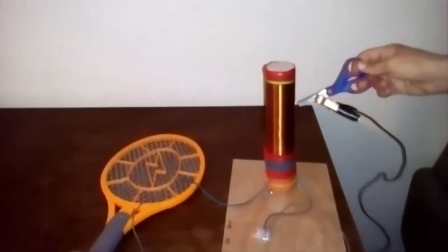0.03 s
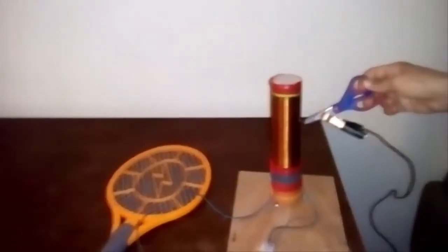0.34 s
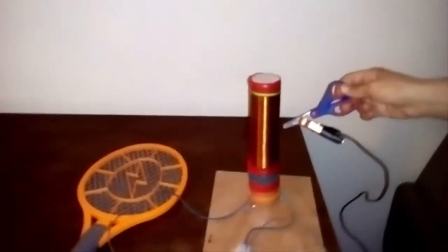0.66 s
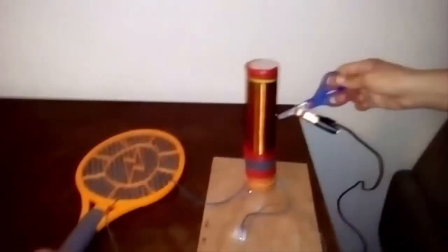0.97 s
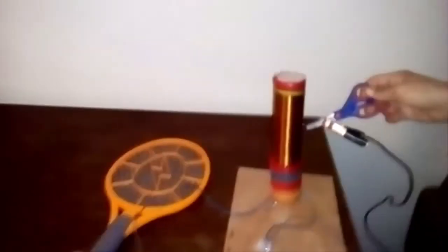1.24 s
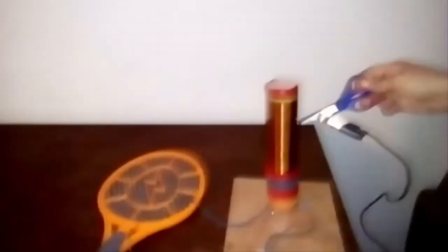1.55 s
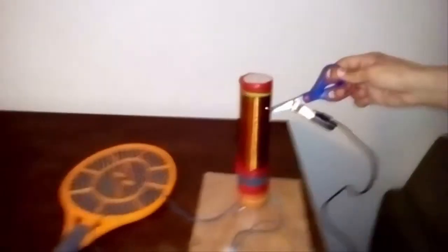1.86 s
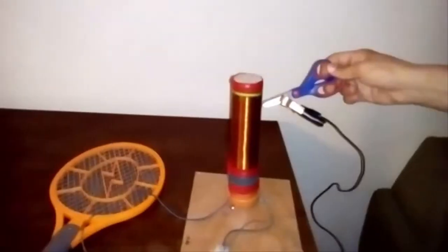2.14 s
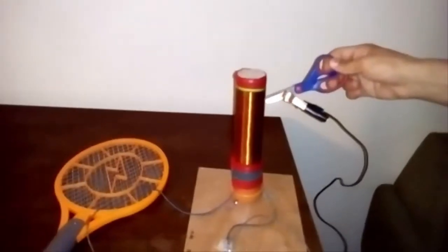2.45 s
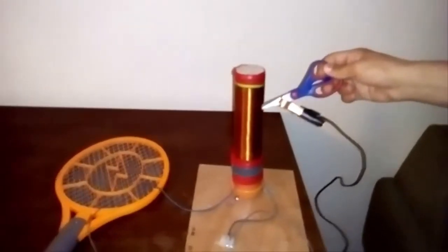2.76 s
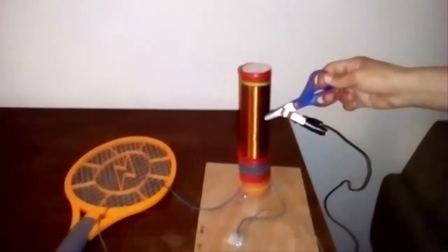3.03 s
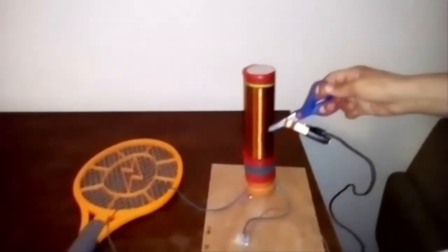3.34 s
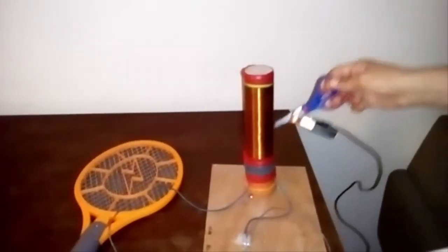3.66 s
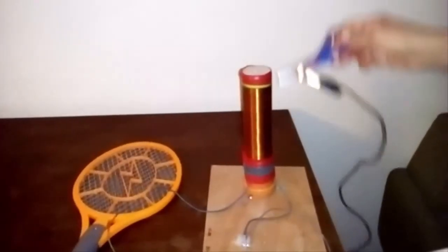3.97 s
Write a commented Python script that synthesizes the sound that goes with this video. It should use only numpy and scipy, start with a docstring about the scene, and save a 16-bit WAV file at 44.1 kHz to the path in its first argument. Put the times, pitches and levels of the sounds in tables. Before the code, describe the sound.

A small high-voltage coil sparks to scissors in a fast, even run of bright clicks.

```python
"""A bare room, at a table where a small homemade high-voltage coil sparks to hand-held scissors.
Nearly eight times a second comes one sharp pressure pulse, doubled by the table top and followed by
the ring of the room. The microphone is small, hand-held and resonant near 5-6 kHz; it overloads on
the strong sparks and picks up soft handling bumps. Faint background noise lies underneath."""
import sys
import numpy as np
from scipy import signal
from scipy.fft import rfft, irfft
from scipy.io import wavfile
from scipy.ndimage import uniform_filter1d

SR = 44100
rng = np.random.default_rng(int(sys.argv[2]) if len(sys.argv) > 2 else 0)


def transcribe(signal):
    """Save signal, clipped to [-1, 1], as a 16-bit WAV file at the path in sys.argv[1]."""
    frames = np.atleast_2d(signal).T
    limited = np.clip(frames, -1, 1)
    pcm = np.round(limited * 32767).astype(np.int16)
    wavfile.write(sys.argv[1], SR, pcm)


N = 176400

# Spectrum of the faint background noise, with a few low hum-like peaks: frequency_hz, relative_db
NOISE_COLOUR = [(25,-19),(80,-7),(170,-1.5),(340,1),(470,-16),(610,0),(730,-10),(860,0.5),(1100,-17),(1500,-17),(2500,-29.5),(5500,-6),(8500,-24),(15000,-46)]
# Level of the faint background noise, quieter in the first half: time_s, relative_db
NOISE_LEVEL = [(0,-3),(1.5,-6),(1.75,0),(2.4,-0.5),(3.1,1.5),(4,-0.5)]
# Handling bumps and scuffs: start_s, rise_s, decay_s, centre_hz, width_octaves, level_db
BUMPS = [(0.237,0.0084,0.032,85,1.7,-59),(0.996,0.013,0.0115,84,0.66,-42.5),(1.55,0.021,0.022,95,0.93,-45),(2.85,.012,0.066,1170,0.53,-55.5),(2.865,0.016,0.15,317,0.7,-54),(3.511,0.049,0.056,240,1.1,-62)]
# Spectrum of the room's ring: frequency_hz, relative_db
RING_COLOUR = [(30,-37),(200,-24.5),(500,-24.5),(900,-27),(1600,-19),(2400,-15.5),(3000,-14),(3850,-6.5),(4400,-4.5),(4950,-2.5),(5500,0),(6000,0.5),(6550,2.5),(6800,-6),(7350,-8),(8100,-19),(10500,-20),(12500,-18.5),(15000,-23),(15900,-42)]
# Reverberation time of the room: frequency_hz, t60_s
RING_T60 = [(200,0.25),(2000,0.35),(6000,.41),(8500,0.36),(11000,0.2),(15000,0.16)]
# Close echoes as the microphone drifts: time_s, board_ms, table_ms, second_table_ms, table_trim_db
ECHO_PATHS = [(.1,0.78,2.02,2.5,3),(.6,0.66,1.6,2.36,-0.5),(1.24,0.59,1.79,1.94,2),(1.62,0.67,1.926,2.35,-1),(1.88,0.82,1.9,2.8,7),(2.27,0.86,1.82,2.9,-12),(2.6,0.824,1.935,2.1,1),(3.2,0.83,2.24,2.2,-4),(3.9,0.77,1.94,2.17,4)]
# Balance of those echoes: board_db, table_db, second_table_db
ECHO_BALANCE = [1, -3, -11]
# Spectrum of a spark as the microphone colours it: frequency_hz, relative_db
CRACK_COLOUR = [(30,-33),(400,-35.5),(900,-32),(1600,-29),(2700,-23),(3800,-10),(4400,-3),(4950,-0.5),(5600,4),(6450,2.5),(6900,-4),(7400,-7.5),(8100,-20.5),(10500,-29),(12500,-28),(15200,-47),(16000,-23)]
# Discharges (echo and ring relative to strength): start_s, strength_db, echo_db, ring_db, body_db, knock_db
SPARKS = [(-.014,7,-9,-12.5,0,0),(.108,8.5,-9.5,-11,4.5,6),(.2315,11,-12,-13.5,4,1),(0.3522,7.5,-8,-11.5,4,5.5),(.4741,9.5,-7.5,-10,1.5,1),(.5956,10.5,-8.5,-10.5,0,1.5),(0.7245,9,-6.5,-10,0.5,-2),(.8508,10,-9,-11.5,1,0.5),(0.9787,11,-9,-11,3,-1),(1.1098,9,-7.5,-10.5,0,-2),(1.2376,11,-6.5,-11,2.5,-7),(1.3646,8.5,-6.5,-11.5,2,2),(1.4943,10,-9,-12.5,4.5,0),(1.6212,9,-7,-10.5,2.5,2),(1.7474,2.5,1.5,-2.5,0.5,-7),(1.8773,5.5,-6.5,-7.5,-5,1.5),(2.0067,7,-7,-8.5,-5.5,1),(2.1395,6,-4.5,-8,-8,-2.5),(2.2697,6.5,-7.5,-9.5,-7,0),(2.4005,2,-6.5,-10,-9.5,-3),(2.5304,-0.8,-5,-8.5,-7,-2.5),(2.6596,.5,-9.5,-9,-8,-3.5),(2.7904,7,-10.5,-8,-5.5,2),(2.9248,7,-13.5,-8.5,-3,5),(3.0536,4,-9,-6.5,0.5,10),(3.1836,-0.2,-10,-8.5,1.5,7),(3.3106,0,-8,-9,1.5,5),(3.447,0,-9,-9,3,9.5),(3.5884,9,-10,-10.5,3,6.5),(3.7287,-0.2,-6.5,-7,1,2),(3.868,-0.4,-6.5,-9.5,1,-6.5)]

CRACK_TRIM_DB, ECHO_TRIM_DB, RING_TRIM_DB = -0.5, 3, -0.5
STEADY_SHARE = 0.57  # share of diffuse energy that keeps its pattern from spark to spark
EARLY_GAIN, EARLY_S = 0.89, 0.002  # nearby furniture thickens the start of the ring
WALL_DB, WALL_FADE_S = -7, 0.03  # distinct echoes off the walls
SCATTER_DB, SCATTER_S = 1, 0.0009  # the coil, wires and hand scatter each crack briefly
BODY_HZ, BODY_OCTAVES = 4780, 0.15  # the crack's lower shoulder, changing with the scissors' angle
KNOCK_HZ, KNOCK_OCTAVES = 2600, 0.44  # the dull part of the crack
FIZZ_DB, FIZZ_S, FIZZ_HZ = -19.5, 0.0012, 8850  # brief hiss of the arc channel
FIZZ_GROWTH = 0.12  # dB of extra hiss per dB of spark strength
LEAD_S = 0.001  # space ahead of each crack for its onset


def amp(db):
    """Decibels to gain."""
    return 10 ** (np.asarray(db) / 20)


def curve_at(table, hz):
    """A table's value on a log-frequency axis."""
    table_hz, values = np.transpose(table)
    return np.interp(np.log(hz + 1), np.log(table_hz + 1), values)


def bell(hz, centre_hz, octaves):
    """A bell curve on a log-frequency axis."""
    return np.exp(-0.5 * (np.log2((hz + 1) / centre_hz) / octaves) ** 2)


def unit(x):
    """Scales to energy one."""
    return x / np.sqrt(np.sum(x ** 2) + 1e-20)


def add(mix, start_s, sound):
    """Mixes a sound in at a time."""
    at = round(start_s * SR)
    sound = sound[max(-at, 0):]
    part = mix[max(at, 0):][:len(sound)]
    part += sound[:len(part)]


def filtered(x, delay_s=0, gain=1):
    """Delays a short sound and colours it by a gain per frequency."""
    hz = np.fft.rfftfreq(len(x), 1 / SR)
    return irfft(rfft(x) * gain * np.exp(-2j * np.pi * delay_s * hz), len(x))


def pulse(colour, size=2048):
    """A minimum-phase pressure pulse with a given spectrum."""
    hz = abs(np.fft.fftfreq(size, 1 / SR))
    log_gain = np.log(amp(curve_at(colour, hz)))
    spectrum = np.exp(np.conj(signal.hilbert(log_gain)))
    return unit(np.fft.ifft(spectrum).real[:size // 2])


def background_noise(level_db=-66.5, patch_db=2, size=1024):
    """Faint noise with low hum-like peaks, slightly patchy in time and frequency."""
    hz, t, spectra = signal.stft(rng.standard_normal(N), SR, nperseg=size)
    patches = uniform_filter1d(rng.standard_normal(spectra.shape), size=7, axis=0)
    patches = uniform_filter1d(patches, size=7, axis=1)
    swell_db = np.interp(t, *np.transpose(NOISE_LEVEL))
    spectra *= amp(curve_at(NOISE_COLOUR, hz)[:, None] + swell_db + patch_db * patches / patches.std())
    noise = signal.istft(spectra, SR, nperseg=size)[1][:N]
    return amp(level_db) * np.sqrt(N) * unit(noise)


def handling():
    """Short swells of dull noise at the microphone as the hands shift."""
    out, t, hz = np.zeros(N), np.arange(SR) / SR, np.fft.rfftfreq(SR, 1 / SR)
    for start_s, rise_s, decay_s, centre_hz, octaves, level_db in BUMPS:
        noise = filtered(rng.standard_normal(SR), gain=bell(hz, centre_hz, octaves))
        envelope = np.minimum(t / rise_s, 1) * np.exp(-np.maximum(t - rise_s, 0) / decay_s)
        add(out, start_s, amp(level_db) * np.sqrt(SR) * unit(noise) * envelope)
    return out


def microphone_drift(reflections):
    """A pattern of many reflections, partly changed by the moving microphone."""
    fresh = rng.standard_normal(len(reflections))
    return np.sqrt(STEADY_SHARE) * reflections + np.sqrt(1 - STEADY_SHARE) * fresh


def room_ring(reflections, click, wall_echoes=12, size=256):
    """Farther off, a few wall echoes in a diffuse tail whose top treble dies first."""
    t = np.arange(len(reflections)) / SR
    diffuse = microphone_drift(reflections) * (1 + EARLY_GAIN * np.exp(-t / EARLY_S))
    hz, age_s, spectra = signal.stft(diffuse, SR, nperseg=size)
    fade = amp(-60 * age_s / curve_at(RING_T60, hz)[:, None])
    tail = signal.istft(spectra * fade, SR, nperseg=size)[1][:len(t)]
    walls = np.zeros(len(t))
    polarities = rng.choice([-1, 1], wall_echoes)
    arrivals = (rng.random(wall_echoes) * 2 * WALL_FADE_S * SR).astype(int)
    walls[arrivals] = polarities
    walls *= np.exp(-t / WALL_FADE_S)
    return unit(signal.fftconvolve(unit(tail) + amp(WALL_DB) * unit(walls), click))


def table_echo(crack, start_s, reflections):
    """The crack thrown back by surfaces within arm's reach."""
    times_s, *columns = np.transpose(ECHO_PATHS)
    *delays_ms, trim_db = [np.interp(start_s, times_s, column) for column in columns]
    levels_db = np.add(ECHO_BALANCE, [0, trim_db, trim_db])
    echoes = sum(amp(db) * filtered(crack, ms / 1000) for db, ms in zip(levels_db, delays_ms))
    age = np.arange(len(crack)) / SR / SCATTER_S
    clutter = microphone_drift(reflections[-len(crack):]) * age ** 2 * np.exp(-age)
    scatter = signal.fftconvolve(crack, clutter)[:len(crack)]
    return unit(unit(echoes) + amp(SCATTER_DB) * unit(scatter))


def direct_crack(click, strength_db, body_db, knock_db):
    """One discharge straight to the microphone, thinner or fuller, with the hiss of its arc."""
    hz, t = np.fft.rfftfreq(len(click), 1 / SR), np.arange(len(click)) / SR
    colour_db = body_db * bell(hz, BODY_HZ, BODY_OCTAVES) + knock_db * bell(hz, KNOCK_HZ, KNOCK_OCTAVES)
    highpass = signal.butter(4, FIZZ_HZ, "high", fs=SR, output="sos")
    fizz = signal.sosfilt(highpass, rng.standard_normal(len(t)) * np.exp(-t / FIZZ_S))
    fizz = amp(FIZZ_DB + FIZZ_GROWTH * strength_db) * unit(fizz)
    return unit(filtered(click + fizz, LEAD_S, amp(colour_db)))


def sparks(ring_delay_s=0.0036):
    """The coil discharges to the scissors: each time a crack, its table echoes, then the room."""
    out = np.zeros(N)
    near_click, far_click = pulse(CRACK_COLOUR), pulse(RING_COLOUR)
    reflections = rng.standard_normal(SR // 2)
    for start_s, strength_db, echo_db, ring_db, body_db, knock_db in SPARKS:
        crack = direct_crack(near_click, strength_db, body_db, knock_db)
        echo = table_echo(crack, start_s, reflections)
        ring = room_ring(reflections, far_click)
        add(out, start_s - LEAD_S, amp(strength_db + CRACK_TRIM_DB) * crack)
        add(out, start_s - LEAD_S, amp(strength_db + echo_db + ECHO_TRIM_DB) * echo)
        add(out, start_s + ring_delay_s, amp(strength_db + ring_db + RING_TRIM_DB) * ring)
    return out


def scene():
    """Sparks and handling at one microphone, over faint background noise."""
    return (sparks() + handling() + background_noise())[None]


def record(dry):
    """The microphone input overloads, a little lopsidedly; then the highest treble is cut."""
    ceiling, knee, lopsidedness, cutoff_hz = 0.65, 8.8, 0.0066, 15800
    clipped = dry / (1.5 + abs(dry / ceiling) ** knee) ** (1 / knee)
    clipped += lopsidedness * clipped ** 2
    lowpass = signal.firwin(255, cutoff_hz, window=("kaiser", 9), fs=SR)
    return signal.oaconvolve(clipped, lowpass[None], "same")


dry = scene()
out = record(dry)
transcribe(out)
```